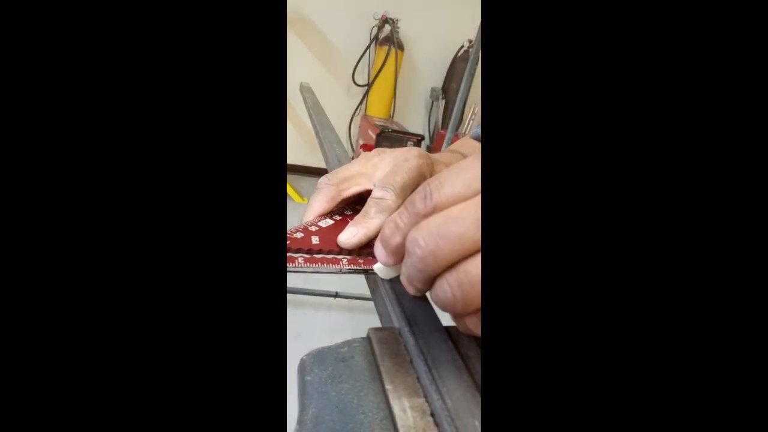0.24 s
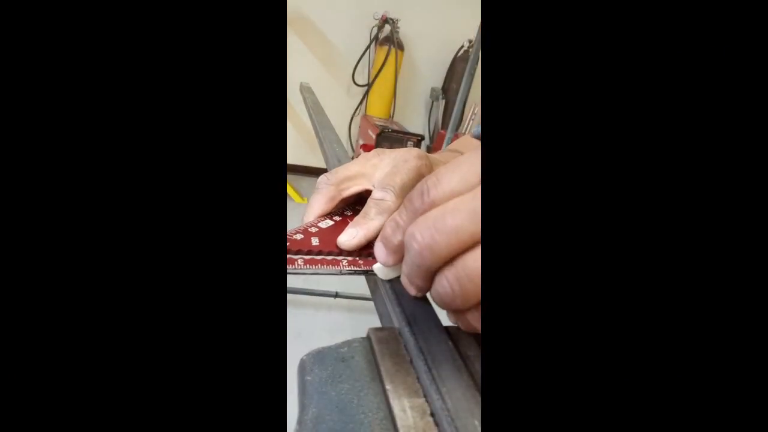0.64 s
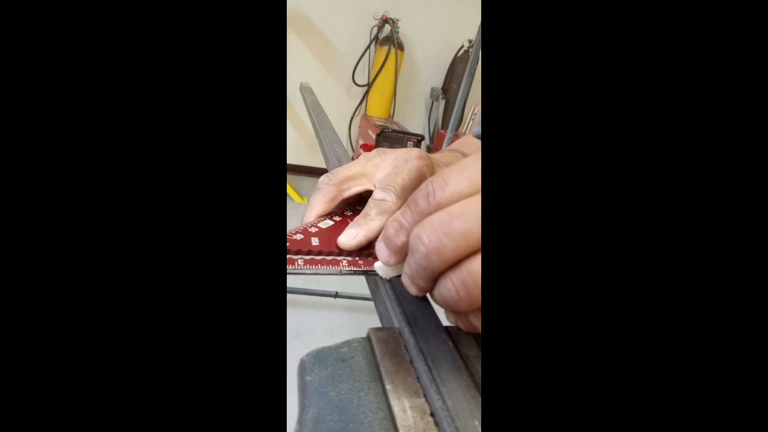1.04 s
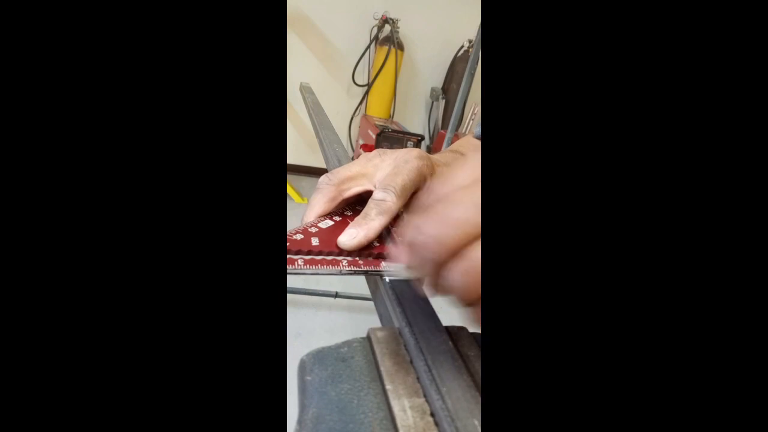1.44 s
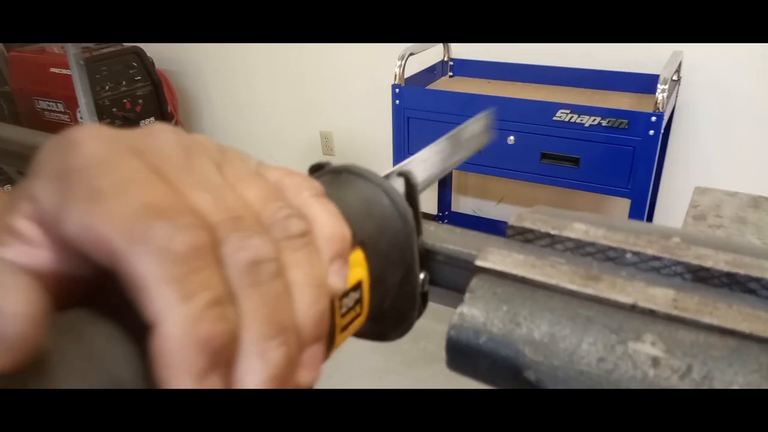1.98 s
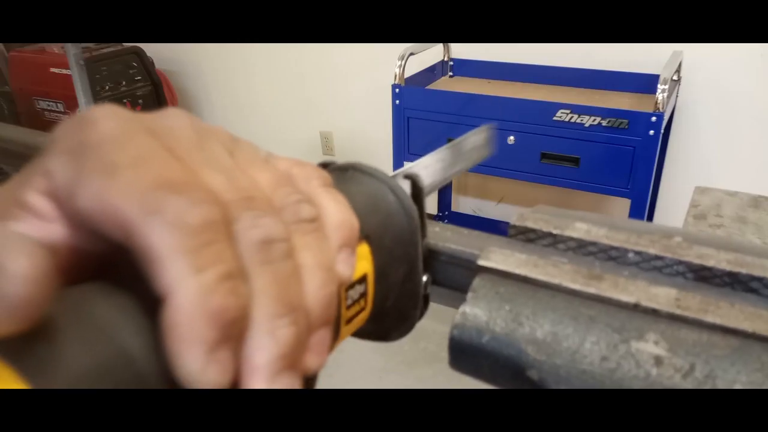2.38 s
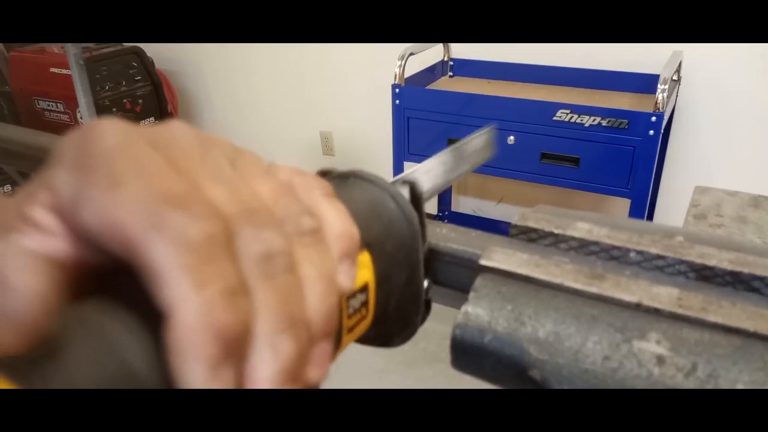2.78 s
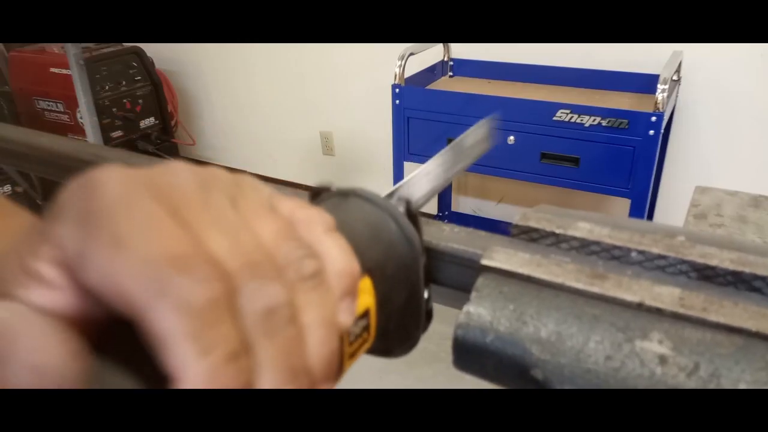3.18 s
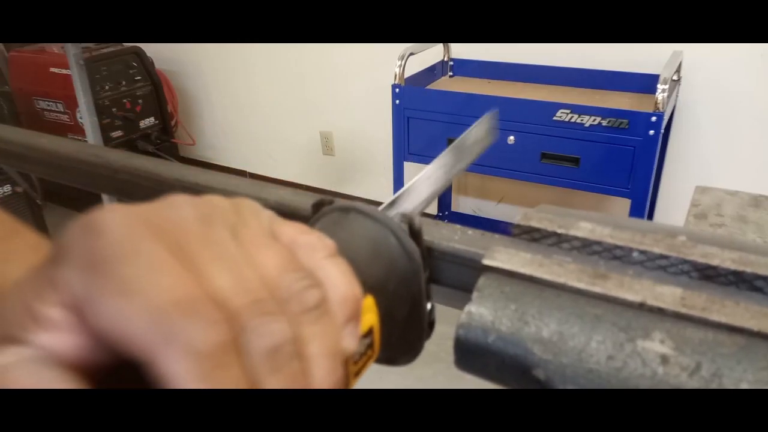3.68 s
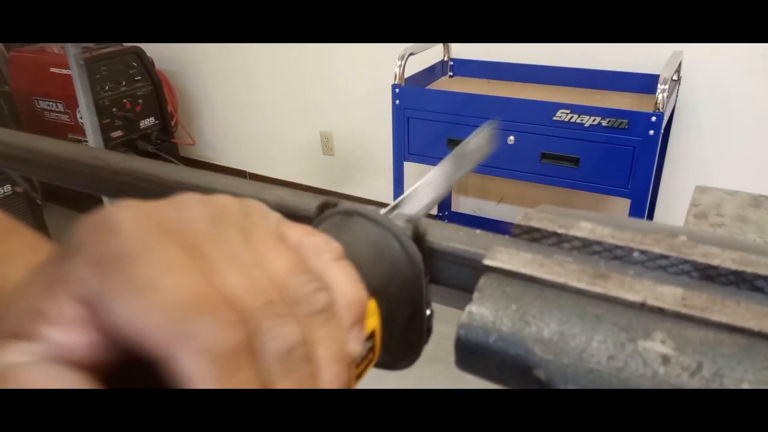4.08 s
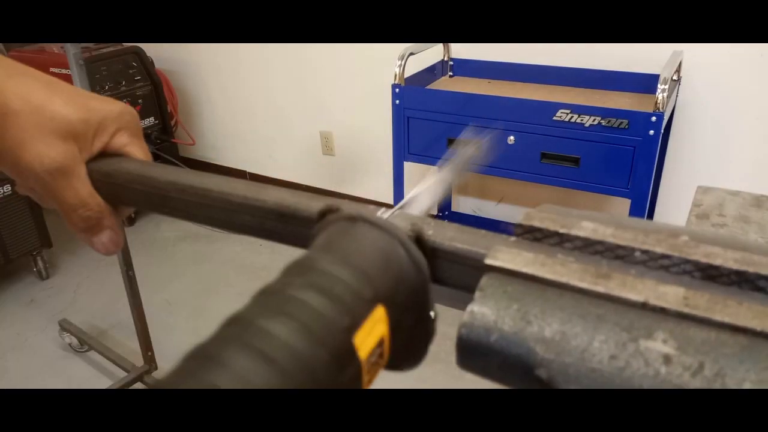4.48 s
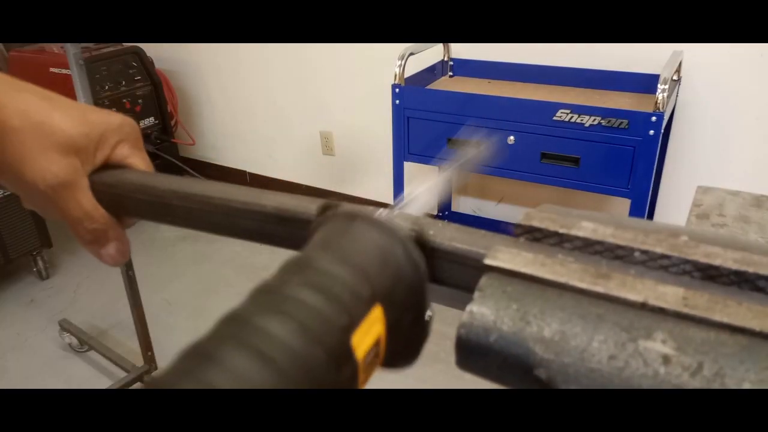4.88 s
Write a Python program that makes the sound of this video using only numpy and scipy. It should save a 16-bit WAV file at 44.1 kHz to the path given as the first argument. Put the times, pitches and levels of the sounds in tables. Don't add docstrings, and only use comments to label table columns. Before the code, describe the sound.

Quiet workshop air, a faint finger slip, then abrupt harsh metal sawing with a ringing tube, a brief clank, and quieter irregular biting.

```python
import sys
import numpy as np
from scipy import signal
from scipy.fft import rfft, irfft, next_fast_len
from scipy.io import wavfile
from scipy.ndimage import uniform_filter1d, minimum_filter1d

SR = 44100
rng = np.random.default_rng(int(sys.argv[2]) if len(sys.argv) > 2 else 0)


def waveform_to_disk(signal):
    frames = np.transpose(np.atleast_2d(signal))
    scaled = np.clip(frames, -1, 1) * 32767
    samples = np.round(scaled).astype(np.int16)
    wavfile.write(sys.argv[1], SR, samples)


def natural_amplitude(level_db):
    exponent = np.asarray(level_db, float) / 20
    return 10 ** exponent


N = 226277
T = np.arange(N) / SR
HZ = np.maximum(np.fft.rfftfreq(next_fast_len(N), 1 / SR), 1)
SCENE_CHANGE_S = 4.2035


def rms_one(x):
    return x / np.sqrt(np.mean(x ** 2) + 1e-20)


def in_time(rows):
    s, *columns = np.transpose(rows)
    return [np.interp(T, s, c) for c in columns]


def colour(points):
    hz, db = np.transpose(points)
    return natural_amplitude(np.interp(np.log(HZ), np.log(hz), db, left=-90, right=-90))


def filtered(x, gain):
    size = next_fast_len(N)
    return irfft(rfft(x, size) * gain, size)[:N]


def shaped(x, gain):
    return rms_one(filtered(x, gain))


def below(hz):
    return 1 / (1 + (HZ / hz) ** 8)


def drift(rate_hz):
    return shaped(rng.standard_normal(N), 1 / (1 + (HZ / rate_hz) ** 2))


def bump(s, length):
    return np.exp(-.5 * ((T - s) / length) ** 2)


def span(start, end, fade):
    return np.clip((T - start) / fade, 0, 1) * (T < end)


def strikes(per_s, spread_db):
    sizes = natural_amplitude(spread_db * np.minimum(rng.exponential(1, N), 5)) * rng.choice([-1, 1], N)
    return sizes * (rng.random(N) < per_s / SR)


# f/Hz, density/dB
STEADY_STEEL = [(35, -39), (60, -22), (196, -7.5), (252, -7), (434, -5.0), (533, -6), (1050, -6.5),
                (1390, -1), (4630, -9.5), (6820, -8), (9160, -15.5), (10700, -12.5), (13800, -24.5),
                (16000, -21.5)]
LATE_STEEL = [(35, -35), (60, -16.5), (276, -4.0), (767, -5.0), (942, -3.0), (1080, -5.0), (1290, 1.5),
              (1660, -0.5), (5070, -9.0), (6510, -8.5), (9160, -16.0), (10300, -7.5), (13800, -23),
              (16000, -22)]
# t/s, level/dB
PRESSURE = [
    [(1.63, -35), (1.9, -34), (2.4, -32.5), (2.87, -33), (3.03, -35.5), (3.19, -33.5), (3.4, -34.5),
     (3.99, -34), (4.11, -36)],
    [(4.21, -40.5), (4.29, -38.5), (4.53, -40), (4.62, -42), (4.68, -37.5), (4.9, -37), (5.1, -38)],
]
# level re pressure/dB, share of its swing, of swells, of lift-off
STEADY_RANGES = [
    (-10.5, 0.46, 0.64, 0.31),
    (-4, 1.26, 0.94, 0.97),
    (-5.5, 0.94, .8, 0.82),
    (-9, 0.65, .6, 1),
]
LATE_RANGES = [
    (-8.5, 1.2, .77, 0),
    (-5, 0.2, 0.88, 0),
    (-4, 1.6, .83, 0),
    (-8, 1.5, 0.72, 0),
]
DEEPER_S, DEEPER_TAKES_S = 2.75, 0.32


def saw():
    turn, swell_db, hum = crank()
    stroke_db = swell_db * (np.cos(turn) + .5 * np.cos(2 * turn + 0.55))
    stroke_db = stroke_db + hard_strokes() + .8 * drift(89)
    *_, start_db, deep_db, late_db = np.transpose(TUBE)
    deeper = span(DEEPER_S, 9, DEEPER_TAKES_S)
    stages = [(1 - deeper, start_db), (deeper, deep_db)]
    steady = cutting(PRESSURE[0], STEADY_RANGES, STEADY_STEEL, stages, stroke_db) + hum
    late = cutting(PRESSURE[1], LATE_RANGES, LATE_STEEL, [(0.98, late_db)], bites())
    late_gain = 0.14 * span(SCENE_CHANGE_S, 9, fade=0.0026) + 0.83 * span(4.2095, 9, fade=0.0023)
    return span(1.6295, SCENE_CHANGE_S, fade=0.0015) * steady + late_gain * late


LIFT_OFF_S, LIFT_OFF_DB, LIFT_OFF_LENGTH_S = 4.117, -13.5, 0.029
RING_FLICKER_DB, RING_FLICKER_HZ = 2, 6


def cutting(pressure, ranges, spectrum, stages, swell_db):
    teeth = strikes(per_s=14000., spread_db=2.0)
    edges = [0, below(1100), below(2800), below(8000), 1]
    rings = [(share, tube(lift_db) - 1) for share, lift_db in stages]
    press_db, = in_time(pressure)
    mean_db = np.mean(np.transpose(pressure)[1])
    lift_off_db = LIFT_OFF_DB * span(LIFT_OFF_S, SCENE_CHANGE_S, LIFT_OFF_LENGTH_S)
    out = 0
    for (db, follows, part, lifts), low, high in zip(ranges, edges, edges[1:]):
        level_db = mean_db + db + follows * (press_db - mean_db) + lifts * lift_off_db
        load = natural_amplitude(part * swell_db + 0.9 * drift(25))
        even = np.sqrt(uniform_filter1d(load ** 2, size=4000))
        blows = teeth * load / even
        gain = colour(spectrum) * (high - low)
        ringing = sum(share * filtered(blows, gain * ring) for share, ring in rings)
        flicker = natural_amplitude(RING_FLICKER_DB * drift(RING_FLICKER_HZ))
        out = out + natural_amplitude(level_db) * rms_one(filtered(blows, gain) + flicker * ringing)
    return out


# f/Hz, width/Hz, lift/dB at start, deeper in, late
TUBE = [(970, 63, 0, 3, 1), (1306, 30, 4, 7, 3.5), (1418, 18, 9, 7.5, 5), (1579, 18, 7.5, 8.5, 1.5),
        (1720, 40, 3, -0.5, -0.5), (1895, 40, 6.5, 3.5, 0.5), (2038, 79, 6, 5, 4), (2270, 190, 1, 4.5, 1.5),
        (2952, 150, 4, 2.5, 4.5), (3450, 60, 1.5, 3, 1.5), (3780, 270, 4, 4, 0), (4348, 80, 4.5, 2.5, 3),
        (4700, 260, -1, -4, -4), (4930, 40, 4, 4, 1), (5870, 78, 3.5, 4, 5), (6630, 200, 4, 5, 6),
        (6745, 28, 4, 3, 4), (6890, 45, 7, -1.5, 0.5), (8546, 70, 6.5, 5, 3.5), (9990, 81, 2.5, 4.5, 7.5),
        (10545, 80, 8.5, 4.5, 5), (11550, 190, 3, 1, 3), (14770, 108, -3, -6, -6),
        (14720, 920, 13, 13.5, 15.5)]


def tube(lift_db):
    poles = [(natural_amplitude(db) - 1) / (1 + 2j * (HZ - row[0]) / row[1]) for row, db in zip(TUBE, lift_db)]
    return 1 + sum(poles)


# t/s, peak level/dB
HARD_STROKES = [(1.7592, -22.5), (1.7925, -24.5), (2.0026, -22), (2.061, -24), (2.084, -26), (2.1323, -24),
                (2.2785, -27), (2.3409, -23), (2.6414, -23), (2.6691, -24.5), (2.73, -24), (2.8592, -22),
                (2.8841, -22), (2.9096, -20), (2.967, -24), (3.0034, -30.5), (3.0293, -20), (3.0755, -24),
                (3.0937, -26), (3.1949, -26), (3.373, -23), (3.4025, -21), (3.4237, -22), (3.4523, -26.5),
                (3.5064, -22), (3.5606, -28), (3.6339, -22), (3.7357, -25), (3.7841, -24), (3.8095, -27),
                (3.927, -26)]
STROKE_USUAL_DB, STROKE_PEAK_S, STROKE_RISE_S, STROKE_FALL_S = -26, .003, .002, .006


def hard_strokes():
    extra_db = 0
    for s, db in HARD_STROKES:
        peak_s = s + STROKE_PEAK_S
        swell = np.where(T < peak_s, bump(peak_s, STROKE_RISE_S), bump(peak_s, STROKE_FALL_S))
        extra_db = extra_db + (db - STROKE_USUAL_DB) * swell
    return extra_db


# t/s, swell/dB
BITES = [(4.214, 3), (4.247, 4), (4.277, 8.5), (4.298, 5), (4.311, 9), (4.343, 6.5), (4.377, 9),
         (4.416, 12.5), (4.435, 8), (4.445, 11.5), (4.467, 5.5), (4.482, 12.5), (4.501, 5.5), (4.514, 9),
         (4.547, 10), (4.57, 5), (4.579, 9.5), (4.601, 5), (4.637, 2.5), (4.665, 3.5), (4.716, 6),
         (4.765, 5), (4.806, 6.5), (4.85, 6), (4.898, 5.5), (4.941, 8), (4.97, 0.5), (5.032, 2),
         (5.062, 5.5), (5.084, 3)]
BITE_S, QUICK_BITE_SHARE = 0.0058, 0.15


def bites():
    lengths = np.minimum(BITE_S, QUICK_BITE_SHARE * np.gradient(np.transpose(BITES)[0]))
    catches_db = sum(db * bump(s, length) for (s, db), length in zip(BITES, lengths))
    return catches_db + 0.71 * drift(64)


# t/s, swell per stroke/dB, hum level/dB
CRANK = [(1.63, 2.5, -47), (1.89, 3.5, -44.5), (2.49, 1, -46), (2.9, 2.5, -53), (3.7, 1, -56.5),
         (3.95, -1, -55), (4.09, 3, -60.5), (4.2, -1, -70)]
# t/s, stroke rate/Hz
SPEED = [(1.63, 41.8), (1.99, 41.2), (2.5, 41.1), (2.69, 38), (2.9, 38.4), (3.15, 39.32), (3.45, 38.4),
         (3.9, 41), (4.2, 41)]
# multiple of stroke rate, level/dB
HUM = [(1, -36.5), (2, -23.5), (3, -11), (4, -58), (5, -4.5), (6, -16), (7, -3.5), (8, -12), (9, -25.5),
       (10, -6.5), (11, -20.5), (12, -9), (13, 1), (14, -8.5), (15, -4.5), (16, -34), (17, -9.5), (18, -43),
       (19, -42), (20, -31.5), (21, -7.5), (22, -16), (23, -16.5), (24, -11.5), (25, -19), (26, -38)]
CRANK_START_TURNS = -.62


def crank():
    swell_db, hum_db = in_time(CRANK)
    turn = 2 * np.pi * (CRANK_START_TURNS + np.cumsum(in_time(SPEED)[0]) / SR)
    hum = 0
    for order, db in HUM:
        hum = hum + natural_amplitude(db + 1.6 * drift(5.5)) * np.sin(order * turn + 2 * np.pi * rng.random())
    return turn, swell_db, natural_amplitude(hum_db) * rms_one(hum)


# start t/s, hold/s, level/dB, decay/(dB/s)
SKIN_HISS = [
    (1.405, .055, -69.5, 550),
    (1.399, 0.066, -82, 200),
]
NAIL_SCRATCH = [
    (1.405, .045, -83, 400),
    (1.4555, 0.018, -59.5, 650),
    (1.49, .03, -88, 130),
]
# f/Hz, density/dB
SKIN_COLOUR = [(2900, -31), (3600, -3), (6000, 0), (7870, 2), (8920, -5), (10100, 3), (13700, -14),
               (15800, 2)]
NAIL_COLOUR = [(590, -51), (1000, -20), (1490, -4), (1820, -12), (2250, -6), (3470, -4), (4470, 1),
               (5360, -17), (6000, -4.5), (8000, -18), (10400, -54), (17600, -120)]


def finger():
    hiss = held(SKIN_HISS) * shaped(rng.standard_normal(N), colour(SKIN_COLOUR))
    scratch = shaped(strikes(per_s=4600.0, spread_db=2.5), colour(NAIL_COLOUR))
    return hiss + held(NAIL_SCRATCH) * scratch


SLIP_RISE_DB_PER_S = 4500


def held(rows):
    total = 0
    for s, hold, db, fall in rows:
        rise_db = SLIP_RISE_DB_PER_S * np.maximum(s - T, 0)
        total = total + natural_amplitude(db - rise_db - fall * np.maximum(T - s - hold, 0))
    return total


# t/s, peak level/dB
CLANK = [
    (4.1305, -34),
]
# f/Hz, level/dB, t60/s
CLANK_MODES = [(5862, -28, 0.29), (6137, -8, 0.16), (6702, -12, 0.46), (8600, 2, 0.29), (9889, 9, 0.063),
               (10540, -1, 0.09)]


def clank():
    (s, peak_db), = CLANK
    age = np.maximum(T - s, 0)
    rings = sum(natural_amplitude(db - 60 * age / t60) * np.sin(2 * np.pi * hz * age) for hz, db, t60 in CLANK_MODES)
    return natural_amplitude(peak_db - 17) * rings * (T < SCENE_CHANGE_S)


# t/s, peak level/dB, f/Hz, length/s
JOLTS = [(1.70, -48, 180, 0.063), (1.904, -50, 158, 0.054), (1.96, -47, 100, 0.032), (2.199, -54, 85, .03),
         (2.256, -53, 85, .03), (2.4, -50, 110.6, 0.026), (2.47, -53, 75, .03), (2.68, -56.5, 85, 0.023),
         (2.962, -54.5, 110, .03), (3.766, -41, 104, 0.012), (3.931, -48.5, 96, 0.024),
         (4.025, -51.5, 95, 0.03), (4.45, -51, 60, 0.031), (4.897, -46.5, 131.4, 0.023),
         (4.899, -52.5, 48, .05)]


def jolts():
    return sum(natural_amplitude(db) * bump(s, length / 2) * np.sin(2 * np.pi * hz * (T - s)) for s, db, hz, length in JOLTS)


# t/s, level/dB, length/s
TOUCHES = [
    (.557, -89, 0.0098),
    (0.588, -99, .015),
    (0.618, -84, .012),
]


def touches():
    lift_db = [14 * (row[0] > 7000) for row in TUBE]
    tap_colour = colour([(6500, -7), (7800, 11), (9000, -5), (15800, -11)])
    tone = shaped(rng.standard_normal(N), tube(lift_db) * tap_colour)
    return tone * sum(natural_amplitude(db) * bump(s, length) for s, db, length in TOUCHES)


# f/Hz, density/dB
AIR = [(21, -33), (35, -13), (106, -8.5), (138, -2.5), (173, -15), (252, -8.5), (340, -21), (598, -26.5),
       (1200, -31.5), (1590, -35.5), (1850, -38), (7000, -45.5), (9100, -76), (15400, -120)]
MIC_HISS = [(7000, -62), (7700, -53), (9000, -54), (14000, -55), (15000, -64), (16000, -61)]
AIR_DB, AIR_WANDER_DB, AIR_SINKS_DB_PER_S = -66.5, 2.1, 0.5


def workshop():
    air = filtered(rng.standard_normal(N), np.hypot(colour(AIR) * below(10200) ** 2, colour(MIC_HISS)))
    wander_db = 0.5 * drift(16) + AIR_WANDER_DB * drift(4.1)
    lumps = natural_amplitude(AIR_DB + wander_db - AIR_SINKS_DB_PER_S * np.minimum(T, 2))
    low = filtered(air, below(400))
    return (lumps * low + natural_amplitude(AIR_DB - 0.4 + 1.1 * drift(11)) * (air - low)) / np.std(low)


def scene():
    return (saw() + clank() + jolts() + finger() + touches() + workshop())[None]


# t/s, level kept/dB, three surest whistles f/Hz
DROPOUTS = [(.075, -14, 800, 1510, 2400), (.395, -14, 700, 1300, 2100), (.647, -14, 700, 1200, 2480),
            (1.481, -28, 1430, 4620, 5800), (1.543, -14, 2400, 3610, 6900), (1.781, -28, 1990, 3580, 5420),
            (1.887, -15, 1356, 4250, 10570), (1.952, -20, 3600, 4930, 6920), (1.983, -40, 530, 1577, 3950),
            (2.645, -27, 1587, 1720, 6180), (2.995, -39, 407, 1300, 9950), (3.062, -23, 450, 5870, 6450),
            (3.128, -25, 2350, 3830, 5430), (3.242, -24, 3100, 5850, 6700), (3.336, -26, 320, 1570, 6700),
            (3.487, -40, 580, 1318, 3420), (3.531, -44, 875, 5610, 10300), (3.701, -28, 3740, 4100, 4950),
            (3.956, -46, 590, 6650, 9840), (4.0, -18, 1342, 2430, 10100), (4.358, -33, 1390, 3710, 9910),
            (4.403, -36.5, 3100, 4470, 5870), (4.545, -27, 3040, 6780, 10380),
            (4.62, -29, 2000, 10050, 11400), (4.788, -32, 280, 4300, 9890), (4.887, -18, 2000, 6700, 10380)]
WIDE_DROPOUTS = [(1.7012, -19, 190, 2900, 4970), (1.869, -27, 540, 4340, 6210),
                 (3.172, -14, 4940, 6270, 8140), (4.998, -21, 820, 4480, 7120)]
DOUBLE_DROPOUTS = [(1.9055, -43, 2890, 3460, 5450), (1.92685, -43, 2910, 6700, 12340),
                   (4.6805, -45, 1240, 2990, 5840), (4.70184, -45, 970, 1270, 5860)]
MORE_WHISTLES = [(1910, 5870, 6890, 10360), (2370, 2710, 3940, 10550), (390, 3770, 10530, 11080),
                 (3010, 5750, 10120, 10390), (160, 1850, 6910, 10580), (1520, 1930, 5470, 10550),
                 (4270, 6600, 9960, 11520), (3040, 6720, 9910, 11520)]
# f/Hz, level/dB
STANDS_DB = [(2000, 11.5), (12000, 16.5)]
FRAME = round(1024 * SR / 48000)
WHISTLE_COUNT, WHISTLE_DB, WHISTLE_APART_LINES = 7, 21, 19
RING_FAVOUR, WIDE_STRICTER_DB = 1.2, 3.5
SQUARENESS = 9


def dropouts(x):
    out, n, k = x.copy(), np.arange(2 * FRAME) + .5, np.arange(FRAME) + .5
    cosines = np.cos(np.pi / FRAME * np.outer(k, n + FRAME / 2))
    sine = np.sin(np.pi * n / (2 * FRAME))
    squarer = signal.windows.kaiser_bessel_derived(2 * FRAME, np.pi * SQUARENESS)
    hz = k * SR / (2 * FRAME)
    need_db = np.interp(hz, *np.transpose(STANDS_DB)) + 99 * (hz > 15500)
    rings_db = [np.interp(hz, HZ, 20 * np.log10(np.abs(tube(lift_db)))) for lift_db in np.transpose(TUBE)[3:]]
    holes = [(*row, *more) for row, more in zip(WIDE_DROPOUTS + DOUBLE_DROPOUTS, MORE_WHISTLES)]
    broad, twice = holes[:len(WIDE_DROPOUTS)], holes[len(WIDE_DROPOUTS):]
    for wide, window, table in [(0, sine, DROPOUTS), (1, squarer, broad), (1, sine, twice)]:
        basis = window * cosines
        for s, left_db, *surest_hz in table:
            frame = slice(round(s * SR) - FRAME, round(s * SR) + FRAME)
            lines = basis @ x[frame]
            level_db = 20 * np.log10(np.abs(lines) + 1e-12)
            local_db = uniform_filter1d(level_db, size=70)
            height_db = level_db - local_db - need_db - 6.0 * wide * (hz < 900)
            kept = lines * natural_amplitude(np.where(height_db > WIDE_STRICTER_DB * wide, 2.5, left_db))
            rank = height_db + RING_FAVOUR * rings_db[int(s > SCENE_CHANGE_S)]
            rank = rank - 6.0 * (hz > 11000) - 3.0 * (hz > 3500)
            rank[np.searchsorted(hz, surest_hz)] += 30
            alone = rank == -minimum_filter1d(-rank, size=WHISTLE_APART_LINES)
            count = WHISTLE_COUNT + 2 * wide if s > 1.4 else 1
            tones = np.argsort(rank + 99 * alone)[-count:]
            whistle_db = WHISTLE_DB - 12 * (s < 1.4)
            kept[tones] = np.sign(lines[tones]) * natural_amplitude(local_db[tones] + whistle_db)
            out[frame] += (kept - lines) @ basis * 2 / FRAME
    return out


def roll_off(x):
    return signal.sosfilt(signal.butter(12, 16800, fs=SR, output="sos"), x)


def record(dry):
    mix = dropouts(.1 * np.tanh(dry[0] / 0.094))
    mix = signal.sosfilt(signal.ellip(16, .5, 75, 15740, fs=SR, output="sos"), mix)
    return roll_off(mix[None])


dry = scene()
out = record(dry)
waveform_to_disk(out)
```